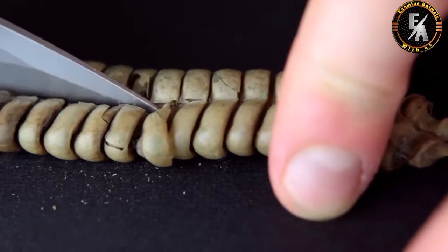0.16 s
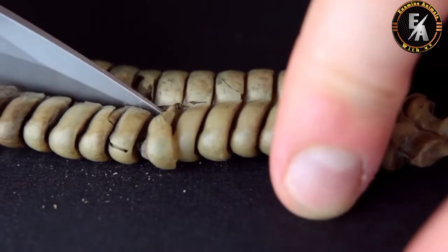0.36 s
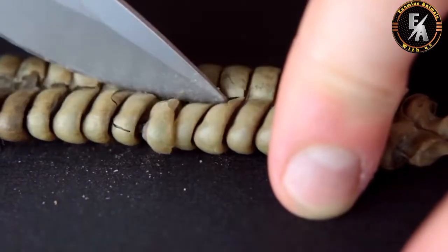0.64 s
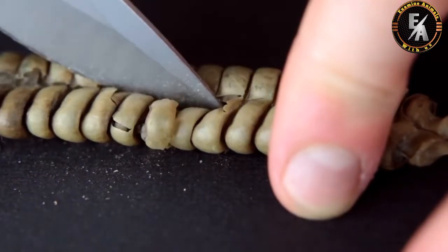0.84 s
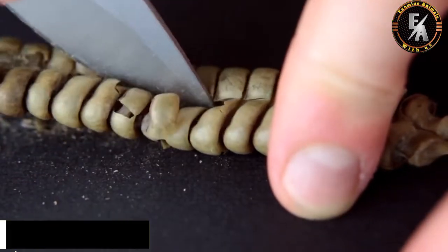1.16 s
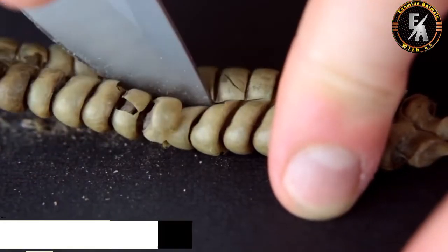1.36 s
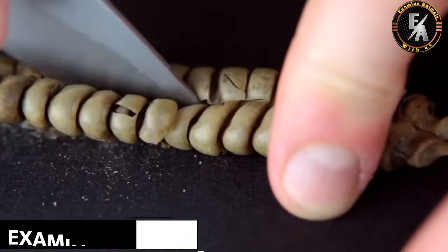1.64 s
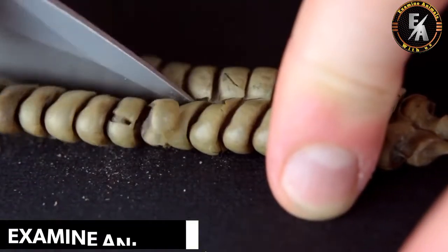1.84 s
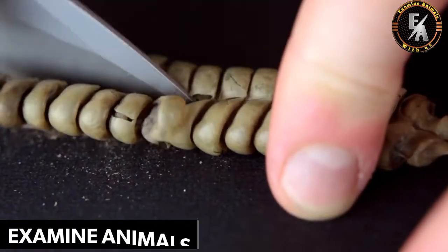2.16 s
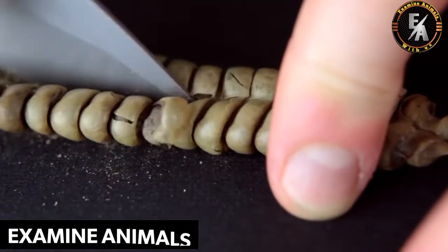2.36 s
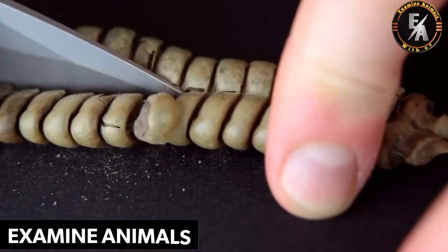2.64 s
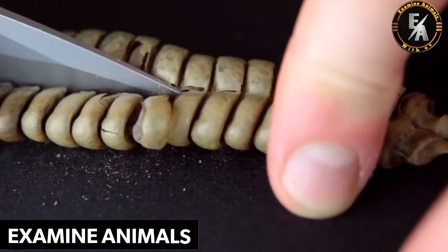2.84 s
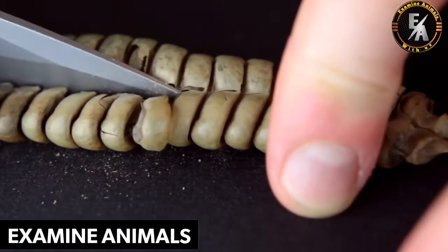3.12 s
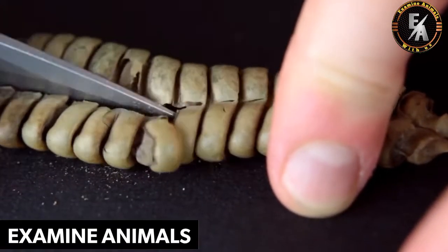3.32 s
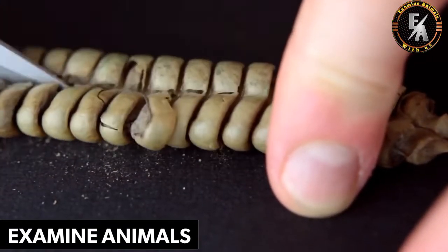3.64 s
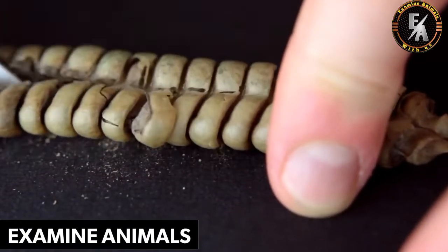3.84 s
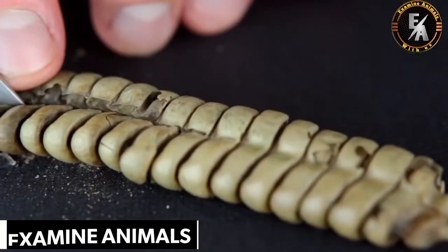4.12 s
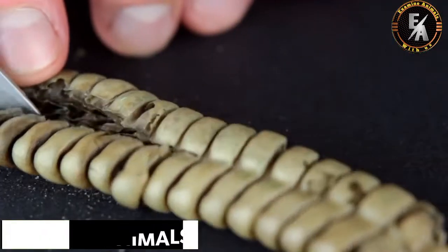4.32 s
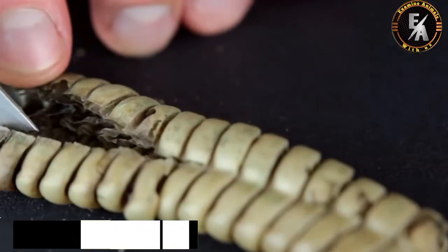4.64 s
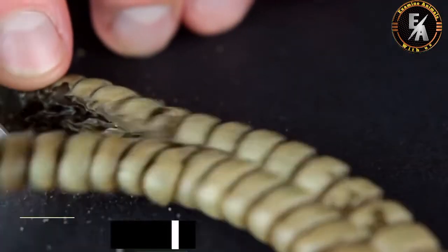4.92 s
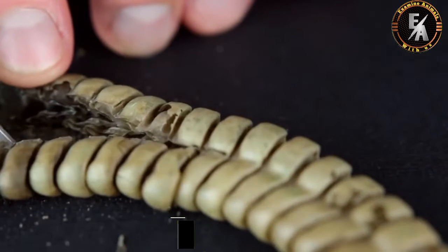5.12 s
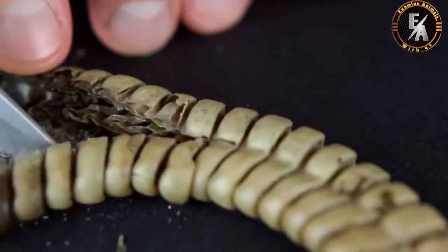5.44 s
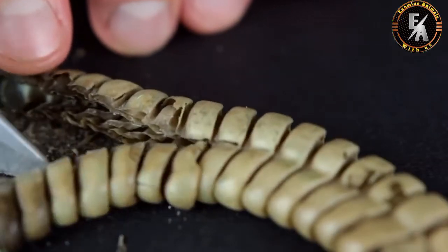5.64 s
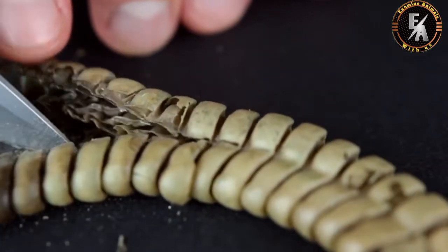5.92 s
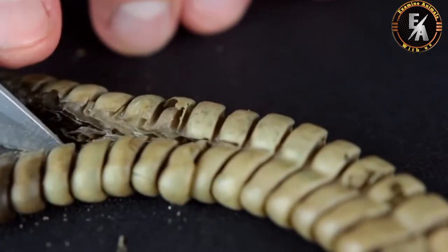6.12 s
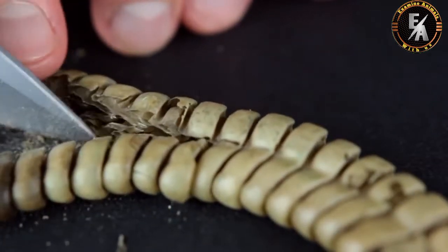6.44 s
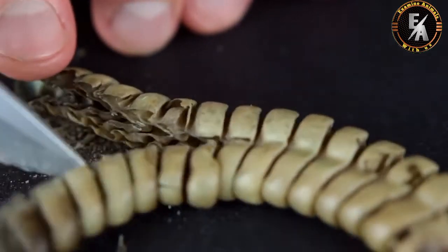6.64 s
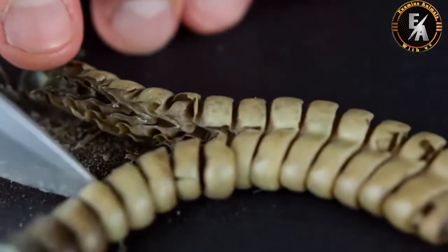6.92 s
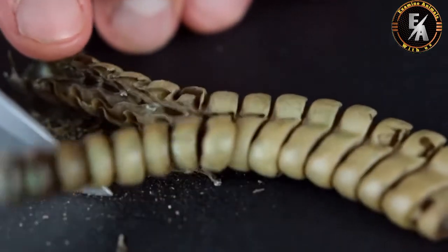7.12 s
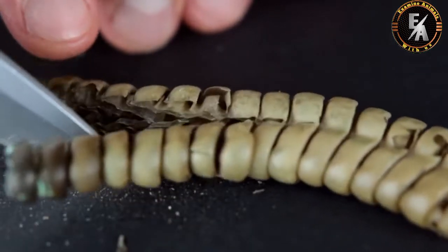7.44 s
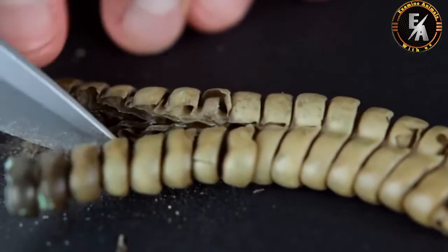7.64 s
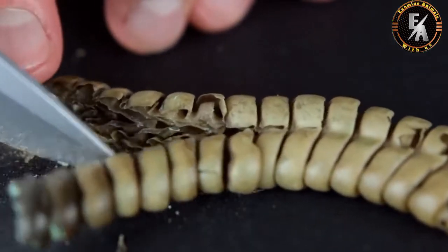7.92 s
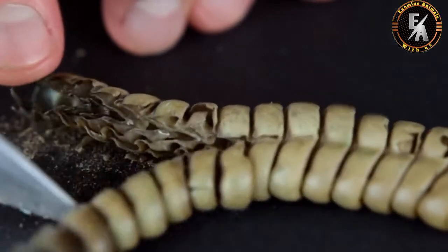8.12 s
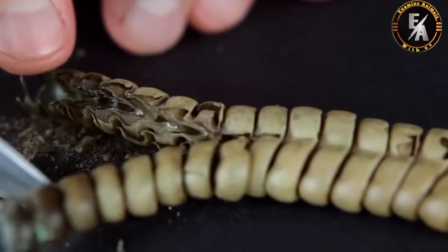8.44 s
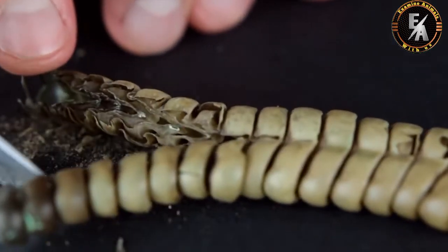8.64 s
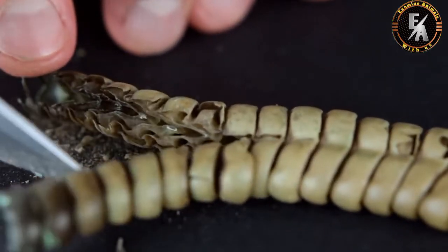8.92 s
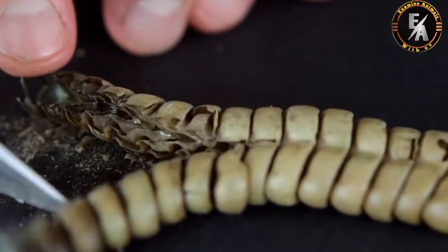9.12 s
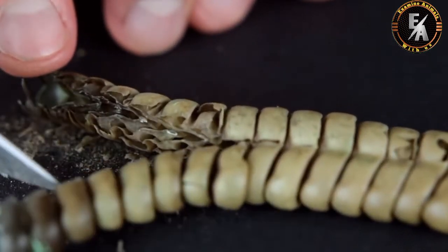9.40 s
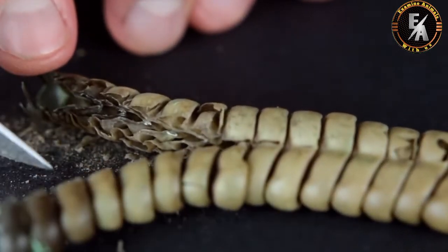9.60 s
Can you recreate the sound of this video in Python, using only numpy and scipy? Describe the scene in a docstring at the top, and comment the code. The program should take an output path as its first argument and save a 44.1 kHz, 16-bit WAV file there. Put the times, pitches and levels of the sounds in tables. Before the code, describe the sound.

Very close, dry sound of a knife cutting a hollow, horny rattle on a table. Small ticks and scrapes lead to dense sharp cracks, with dull tabletop knocks under the hardest breaks. After about three seconds it thins into rasping and rubbing; one half gives way with a snap and thump near five seconds, then only light scrapes remain over low room rumble and hiss.

```python
"""A faint knock and a brittle tick open over low room rumble and hiss: a knife splits a dried rattle on a table.
Hollow horny segments crack one after another, as noise bursts through shell, cavity and piece resonances.
The hardest breaks knock blade and shell against the tabletop, a bank of decaying modes under a dull thud.
Then the halves are prised apart: the blade rasps along them as random slips ringing shell and flakes,
and one half gives way and thumps on the table. Rubbing, thin swishes and a faint room tail fill the gaps."""
import sys
import numpy as np
from scipy import signal
from scipy.fft import rfft, irfft
from scipy.io import wavfile

SR = 44100
rng = np.random.default_rng(int(sys.argv[2]) if len(sys.argv) > 2 else 0)


def generate_wav(signal):
    """Clip the signal to [-1, 1] and save it as 16-bit WAV at the path in sys.argv[1]."""
    frames = np.transpose(np.atleast_2d(signal))
    scaled = np.clip(frames, -1, 1) * 32767
    pcm = np.round(scaled).astype(np.int16)
    wavfile.write(sys.argv[1], SR, pcm)


N = 430856


def from_db(db):
    """Decibels to gain."""
    return 10 ** (np.asarray(db) / 20)


def rms_one(x):
    """Scale to rms 1."""
    return x / np.sqrt(np.mean(x ** 2) + 1e-20)


def unit_energy(x):
    """Scale to energy 1."""
    return x / np.sqrt(np.sum(x ** 2) + 1e-20)


def blow(x):
    """Scale a short sound to the energy of 10 ms at level 1."""
    return unit_energy(x) * np.sqrt(SR * .01)


def seconds(length):
    """Time axis of a short sound."""
    return np.arange(int(length * SR)) / SR


def at_hz(points, hz):
    """Read a table on a log-frequency axis."""
    table_hz, values = np.array(points)[:, 0], np.array(points)[:, 1]
    # the tiny offset keeps 0 Hz out of the logarithm
    return np.interp(np.log(hz + 0.00089), np.log(table_hz), values)


def add(out, s, sound):
    """Mix a sound in at time s."""
    at = max(0, round(s * SR))
    out[at:at + len(sound)] += sound[:N - at]


def through(x, response):
    """Filter by an impulse response."""
    return signal.fftconvolve(x, response)[:len(x)]


def drift(rate):
    """Random wander of rms 1, with `rate` turning points per second joined by straight lines."""
    knots = rng.standard_normal(int(rate * N / SR) + 2)
    return rms_one(np.interp(np.arange(N) * rate / SR, np.arange(len(knots)), knots))


def colour(spectrum, size=2048):
    """Causal (minimum-phase) response with the shape of the given spectrum and energy 1."""
    gain = from_db(at_hz(spectrum, np.fft.rfftfreq(size, 1 / SR)))
    cepstrum = irfft(np.log(gain))
    # folding the cepstrum onto positive time makes the response minimum-phase
    cepstrum[1:size // 2] *= 2
    cepstrum[size // 2 + 1:] = 0
    return unit_energy(irfft(np.exp(rfft(cepstrum))))


def resonate(x, hz, width_hz):
    """One resonance with gain 1 at its top."""
    r = np.exp(-np.pi * width_hz / SR)
    zeros = np.array([1, 0, -1]) * (1 - r * r) / 2
    poles = [1, -2 * r * np.cos(2 * np.pi * hz / SR), r * r]
    return signal.lfilter(zeros, poles, x + 1e-18)


def burst(t, fast_s, slow_s, slow_db):
    """A sudden break followed by a weaker, slower shiver of noise."""
    envelope = np.exp(-t / fast_s) + from_db(slow_db) * np.exp(-t / slow_s)
    return rng.standard_normal(len(t)) * envelope


# rumble and hiss common to both channels, relative spectrum: (frequency [Hz], density [dB])
FLOOR_SPECTRUM = [(20, -6), (80, 0.5), (140, 1.5), (200, -6.5), (350, -9), (800, -14), (2000, -15),
                  (15500, -17)]
# background of opposite sign in left and right, relative spectrum: (frequency [Hz], density [dB])
FLOOR_SIDE_SPECTRUM = [(20, 5), (224, -1.5), (729, -2), (3500, -10), (6000, -5), (15000, -4.5)]


def floor(mid_db=-58.5, side_db=-62.5):
    """Steady coloured noise: a shared low rumble and hiss, plus a side noise that spreads it in stereo."""
    mid = rms_one(through(rng.standard_normal(N), colour(FLOOR_SPECTRUM, size=8192)))
    side = rms_one(through(rng.standard_normal(N), colour(FLOOR_SIDE_SPECTRUM, size=8192)))
    left_right = np.array([[1], [-1]])
    return from_db(mid_db) * mid + from_db(side_db) * side * left_right


# room decay: (frequency [Hz], time to fall 60 dB [s])
ROOM_DECAY = [(150, 0.67), (500, 0.24), (1200, 0.59), (2200, 0.14), (3800, 0.19), (7000, 0.027),
              (15000, 0.17)]


def room(x, onset_s=0.00043):
    """A diffuse tail: noise bands that each die away at the room's own pace for that frequency."""
    t, tail = seconds(.45), 0
    edges = np.geomspace(90, 17000, 13)
    for low, high in zip(edges, edges[1:]):
        bandpass = signal.butter(2, [low, high], "band", fs=SR, output="sos")
        band = signal.sosfilt(bandpass, rng.standard_normal(len(t)))
        t60 = at_hz(ROOM_DECAY, np.sqrt(low * high))
        tail = tail + band * np.exp(-np.log(1000) * t / t60)
    # tone of the walls: (frequency [Hz], relative density [dB])
    walls = colour([(150, -7.0), (500, 3.0), (1000, -6.5), (2000, -0.5), (3000, 1.5), (3800, -1.0),
                    (5000, 2.5), (8000, -3.0), (15000, -7.0)])
    swelling_tail = tail * (1 - np.exp(-t / onset_s))
    return through(x, unit_energy(through(swelling_tail, walls)))


SAG_DB_PER_S, RELEASE_S = 28, 0.031


def gesture(rise_s, length_s):
    """Force gathers, sags while the hand moves on, and is released."""
    t = seconds(length_s + 10 * RELEASE_S)
    attack = np.minimum(t / rise_s, 1)
    hold = from_db(-SAG_DB_PER_S * np.maximum(t - rise_s, 0))
    release = np.exp(-np.maximum(t - length_s, 0) / RELEASE_S)
    return attack * hold * release


def friction(per_s, clump_db=3.0):
    """Uneven slips in clumps; the finest merge into a hiss, more so when slips come fast."""
    sizes = from_db(4.5 * np.minimum(rng.exponential(1, N), 3.2)) * rng.choice([-1, 1], N)
    happens = rng.random(N) < per_s / SR
    slips = rms_one(sizes * happens / np.sqrt(per_s))
    hiss = rng.standard_normal(N) * np.sqrt(per_s / 4000)
    return (slips + hiss) * from_db(clump_db * drift(120))


# the rattle dragged on the table: (start [s], rise [s], length before release [s], level [dB])
DRAG_GESTURES = [(0.878, 0.042, 0.094, -52.5), (3.444, 0.14, 0.55, -52.5), (4.893, 0.043, 0.61, -56.5),
                 (6.878, 0.041, 0.45, -63)]
# dull tone of the rubbing, relative spectrum: (frequency [Hz], density [dB])
RUB_SPECTRUM = [(40, -29.5), (100, -0.5), (200, 1), (550, -14.5), (1200, -20.5), (2500, -40)]


def drag(lumps_db=1.5):
    """Dull, lumpy rubbing of shell and fingers on the tabletop: slow friction through a dark filter."""
    force = np.zeros(N)
    for s, rise_s, length_s, db in DRAG_GESTURES:
        add(force, s, from_db(db) * gesture(rise_s, length_s))
    lumpy = friction(900) * from_db(lumps_db * drift(25))
    return force * rms_one(through(lumpy, colour(RUB_SPECTRUM)))


# blade rubbing sideways: (start [s], rise [s], length before release [s], level [dB])
SWISH_GESTURES = [(3.764, 0.11, 0.12, -52), (7.948, 0.077, 0.27, -52.5)]
SWISH_START_HZ, SWISH_SINK_HZ_PER_S = 8270, 6000


def swish(width_hz=1300):
    """A thin band of friction that sinks in pitch as the contact moves along the shell."""
    glide = np.zeros(N)
    for s, rise_s, length_s, db in SWISH_GESTURES:
        force = from_db(db) * gesture(rise_s, length_s)
        hz = SWISH_START_HZ - SWISH_SINK_HZ_PER_S * np.arange(len(force)) / SR
        carrier = np.sqrt(2) * np.cos(2 * np.pi * np.cumsum(hz) / SR)
        add(glide, s, force * carrier)
    lowpass = signal.butter(2, width_hz, fs=SR, output="sos")
    # low friction noise multiplied by the carrier becomes a band around it
    return glide * rms_one(signal.sosfilt(lowpass, friction(2500)))


# for a while the point works in narrower segments, whose cavities ring higher by this ratio
NARROW_FROM_S, NARROW_UNTIL_S, NARROW_TUNING = 0.5, 1.5, 1.14


def in_narrow_part(s):
    """Whether the point is in the narrower segments at time s."""
    return (s > NARROW_FROM_S) & (s < NARROW_UNTIL_S)


# air cavities of the hollow segments before tuning: (frequency [Hz], width [Hz], relative level [dB])
CAVITY_MODES = [(2266, 290, 2), (3180, 230, 2.5), (3680, 230, 9), (4400, 160, -5), (5925, 370, -7.5)]


def hollow(x, ring_db, tuning=1):
    """The air in the segments rings along with whatever shakes the shell."""
    air = sum(from_db(db) * resonate(x, hz * tuning, width) for hz, width, db in CAVITY_MODES)
    return x + from_db(ring_db) * air


# lone slips while the point cuts, a dense rasp while the blade slides
CUT_FROM_S, CUT_UNTIL_S = 0.61, 3.45
CUT_SLIPS_PER_S, SLIDE_SLIPS_PER_S = 700, 2500


def slip_rate():
    """Slips per second: few while cutting, many while sliding."""
    t = np.arange(N) / SR
    return np.where((t > CUT_FROM_S) & (t < CUT_UNTIL_S), CUT_SLIPS_PER_S, SLIDE_SLIPS_PER_S)


# strokes of the blade along the shell, before the pressure wanders:
# (start [s], rise [s], length before release [s], rasp level [dB], grit relative to rasp [dB])
BLADE_STROKES = [(0.225, 0.11, 0.17, -46.5, -6), (0.571, 0.11, 0.31, -51, -8),
                 (0.826, 0.046, 0.33, -46.5, -3), (1.186, .06, 0.24, -45.5, -4),
                 (1.554, 0.39, 0.55, -39.5, -2), (2.177, 0.18, 0.15, -41.5, 3.5),
                 (2.476, 0.072, 0.13, -44, 0.5), (2.723, 0.046, 0.2, -48.5, 3),
                 (3.27, 0.098, 0.25, -47, -2), (3.464, 0.067, 0.13, -44, -1.5),
                 (3.605, 0.041, 0.074, -42.5, 0), (3.68, 0.23, 0.36, -51.5, 0.5),
                 (4.261, 0.13, 0.24, -45, -3.5), (4.561, 0.01, 0.15, -47.5, -6),
                 (4.74, 0.043, 0.03, -54.5, -0.5), (4.84, 0.041, 0.18, -54, -7),
                 (4.986, 0.033, 0.03, -40, 1.5), (5.039, 0.002, 0.0072, -27, -4.5),
                 (5.428, 0.064, 0.074, -41.5, -3), (5.517, 0.0073, 0.14, -59, -23),
                 (5.787, 0.034, 0.078, -54.5, -15), (6.103, 0.074, 0.06, -49, 2),
                 (6.282, 0.047, 0.084, -61, -6), (6.562, 0.24, 0.38, -51.5, -5.5),
                 (6.97, 0.11, 0.16, -54, 0), (7.18, 0.025, 0.029, -46.5, -2),
                 (7.24, 0.0088, 0.063, -49.5, -6.5), (7.419, 0.039, 0.063, -48.5, -1.5),
                 (7.526, 0.11, 0.099, -49, -5), (7.728, 0.037, 0.052, -58.5, 1),
                 (7.92, 0.26, 0.38, -52, -5), (8.416, 0.048, 0.08, -49.5, -4),
                 (8.656, .05, 0.059, -60.5, -2.5), (8.978, 0.021, 0.093, -56, 2),
                 (9.126, 0.13, 0.22, -48, -4)]
# between strokes the blade rests lightly on the shell, until it is lifted
RESTING_DB, RESTING_WANDER_DB, RESTING_GRIT_DB, LIFT_S = -63.5, 4.5, -8.5, 5.9
# broken edges grate on after a crack: level against its ring, and how fast they settle
SETTLE_DB, SETTLE_DB_PER_S = -30.5, 106


def contact():
    """Strength of rasp and grit: powers of strokes, resting blade and edges settling after cracks add up."""
    t, settling = seconds(0.58), np.zeros(N)
    for s, ring_db, _, _ in CRACK_EVENTS:
        add(settling, s, from_db(ring_db + SETTLE_DB - SETTLE_DB_PER_S * t) ** 2)
    not_lifted = np.arange(N) / SR < LIFT_S
    resting = from_db(RESTING_DB + RESTING_WANDER_DB * drift(10)) * not_lifted
    rasp_power = settling + resting ** 2
    grit_power = rasp_power * from_db(RESTING_GRIT_DB) ** 2
    for s, rise_s, length_s, db, grit_db in BLADE_STROKES:
        force = from_db(db) * gesture(rise_s, length_s)
        add(rasp_power, s, force ** 2)
        add(grit_power, s, (from_db(grit_db) * force) ** 2)
    return np.sqrt(rasp_power), np.sqrt(grit_power)


def flakes(slips, low_hz, high_hz, width_hz, wander_db=6.5, count=14):
    """Each slip rings one of several pieces; which of them speak changes as the edge moves on."""
    dealt = rng.integers(0, count, N)
    ringing = 0
    for k, hz in enumerate(np.geomspace(low_hz, high_hz, count)):
        piece = resonate(slips * (dealt == k), hz, width_hz)
        ringing = ringing + piece * from_db(wander_db * drift(6.3))
    return rms_one(ringing)


# body of the scrape, relative spectrum: (frequency [Hz], density [dB])
RASP_SPECTRUM = [(500, -7.5), (1400, -8), (2200, -5.5), (3600, 3), (5000, 3.5), (7000, -6.5), (10000, -16),
                 (16000, -4)]
# fizz on top of the scrape, relative spectrum: (frequency [Hz], density [dB])
GRIT_SPECTRUM = [(2000, -27), (4500, -15), (7000, 2.5), (9000, 3.5), (12500, 0.5), (15500, -5)]
# resonances of the thin shell walls: (frequency [Hz])
WALL_HZ = [7330, 9500, 12450]
WALL_WIDTH_HZ = 450


def scrape(rasp_gain, grit_gain, flake_db=-4.5, chip_db=-8.5, catch_db=4.5, wall_db=-10.5):
    """The edge catches and slips, jerkier when slow: shell and chips rasp, small flakes and walls add grit."""
    per_s = slip_rate()
    jerk_db = catch_db * np.sqrt(per_s.min() / per_s)
    pressure = rms_one(from_db(jerk_db * drift(150)))
    fine, coarse = friction(per_s), friction(1.5 * per_s)

    rubbed = through(coarse, colour(RASP_SPECTRUM))
    wide = hollow(rubbed, ring_db=-4.5)
    narrow = hollow(rubbed, ring_db=-4.5, tuning=NARROW_TUNING)
    shell = rms_one(np.where(in_narrow_part(np.arange(N) / SR), narrow, wide))
    chips = flakes(coarse, low_hz=3100, high_hz=6000, width_hz=260)
    rasp = rms_one(shell + from_db(chip_db) * chips)

    fizz = through(fine, colour(GRIT_SPECTRUM))
    walls = sum(resonate(fizz, hz, WALL_WIDTH_HZ) for hz in WALL_HZ)
    fizz = rms_one(fizz + from_db(wall_db) * walls)
    small_flakes = flakes(fine, low_hz=6000, high_hz=14400, width_hz=350)
    grit = rms_one(fizz + from_db(flake_db) * small_flakes)
    return pressure * (rasp_gain * rasp + grit_gain * grit)


def crumbs(rasp_gain, tries=1100, shell_db=0, piece_db=-1, spread_db=9, over_rasp_db=-7.0):
    """Tiny splinters snap off at random under the edge, most of them while it cuts slowly."""
    out, t = np.zeros(N), seconds(.015)
    level_db, per_s = 20 * np.log10(rasp_gain + 1e-9), slip_rate()
    splinter, shell = colour(SPLINTER_SPECTRUM, size=256), colour(SHELL_SPECTRUM, size=256)
    for when, chance, size, pitch in rng.random((tries, 4)):
        at = int(when * N)
        if chance < per_s.min() / per_s[at]:
            snap = burst(t, fast_s=.0003, slow_s=.002, slow_db=-22)
            piece = unit_energy(resonate(snap, 2800 * 4.5 ** pitch, 500))
            edge = unit_energy(through(snap, splinter))
            body = from_db(shell_db) * unit_energy(through(snap, shell))
            # few crumbs are large, and none is louder than -39 dB
            db = min(level_db[at] + over_rasp_db + spread_db * size ** 2, -39)
            add(out, at / SR, from_db(db) * blow(edge + body + from_db(piece_db) * piece))
    return out


# blows passed to the table: (time [s], level [dB], centre of the push [Hz]: low = soft and heavy); # the rows #
# near 2 kHz at 1.5558 and 1.892 are no blows: they only add a harsh mid band under the two loudest cracks
TABLE_KNOCKS = [(0.001, -46, 835), (1.173, -40.5, 161), (1.205, -29.5, 151), (1.2065, -35, 613),
                (1.332, -42, 590), (1.522, -43.5, 680), (1.5558, -23.5, 1980), (1.556, -22, 506),
                (1.727, -34.5, 644), (1.739, -35.5, 690), (1.779, -34.5, 670), (1.798, -39, 949),
                (1.842, -36.5, 610), (1.891, -18, 630), (1.892, -21, 1880), (1.893, -45, 70),
                (1.987, -16.5, 865), (2.152, -32.5, 990), (2.288, -35, 875), (2.335, -33, 840),
                (2.39, -27.5, 925), (2.561, -32.5, 720), (2.62, -33.5, 840), (2.908, -47.5, 1700),
                (3.473, -51.5, 520), (3.53, -52, 300), (3.603, -44, 175), (4.35, -48.5, 1106),
                (5.028, -35.5, 2400), (5.052, -22, 142), (5.054, -22.5, 480), (5.341, -54, 200),
                (5.43, -53.5, 298), (5.608, -50, 646), (7.27, -53.5, 198)]
# tabletop modes, before each spot varies them:
# (frequency [Hz], relative level [dB], time to fall 60 dB [s])
TABLETOP_MODES = [(151, 4, 0.14), (228, -3.5, 0.284), (277, -7, 0.15), (404, -1.5, 0.25), (480, 0, 0.097),
                  (498.6, -7, 0.33), (587, -0.5, 0.049), (668, -7, 0.16), (830, -4.5, 0.059),
                  (955, 9.5, 0.075), (1185, -1, 0.18), (1274, -5, 0.15), (1490, -6, 0.17), (1600, -4, 0.2)]


def knocks(push_width=0.77, spread_db=2.0, softness=3.0, ring_db=-2.5, ring_db_per_octave=-3.5,
           bottom_db=-16, detune=0.011):
    """A push gives a broad, ragged thud and rings the tabletop modes, differently at each blow."""
    out, t = np.zeros(N), seconds(.4)
    hz, mode_db, t60 = np.transpose(TABLETOP_MODES)[:, :, None]
    # tone of the thud: (frequency [Hz], relative density [dB])
    top = colour([(50, -13.5), (150, -3), (300, -0.5), (480, 4.0), (950, 0), (1500, -1.0),
                  (2500, -12), (8000, -33.5)])
    for s, db, push_hz in TABLE_KNOCKS:
        spot, strength, sign = rng.standard_normal((3, len(hz), 1))
        decay = from_db(mode_db + spread_db * strength - 60 * t / t60)
        modes = np.sign(sign) * decay * np.sin(2 * np.pi * hz * (1 + detune * spot) * t)
        ragged = through(burst(t, fast_s=0.0033, slow_s=0.0341, slow_db=-24.5), top)
        # the push favours whatever lies near its own centre
        ring = unit_energy(resonate(modes.sum(0), push_hz, push_width * push_hz))
        thud = unit_energy(resonate(ragged, push_hz, push_width * push_hz))
        # the push itself, one short hump of force, fills in the bass
        bottom = unit_energy(t * np.exp(-2 * np.pi * push_hz * t))
        # the slower the push, the more of it goes into the modes
        ring = ring * from_db(ring_db + ring_db_per_octave * np.log2(push_hz / 500))
        # a soft push cannot reach high
        soft = signal.butter(3, min(softness * push_hz, SR / 4), fs=SR, output="sos")
        knock = signal.sosfilt(soft, ring + thud + from_db(bottom_db) * bottom)
        add(out, s, from_db(db) * blow(knock))
    return out


# shell cracks: (time [s], shell ring before the shell lift [dB], bright splinter level [dB],
# pitch of the broken piece [Hz])
CRACK_EVENTS = [(0.0261, -56.5, -47.5, 12200), (0.3384, -43, -40.5, 4560), (0.366, -44, -41, 12500),
                (0.381, -50, -29.5, 7100), (0.576, -31, -42, 3980), (0.718, -52, -43.5, 10100),
                (0.7769, -25, -39, 4040), (0.791, -59, -43, 10100), (0.8348, -49, -40, 9500),
                (0.8563, -42, -41, 5630), (0.8794, -31, -27, 4200), (0.8922, -38, -42, 8900),
                (0.9066, -31, -29, 4260), (0.9501, -32, -27, 5940), (0.9597, -22, -16.5, 4400),
                (0.9766, -33.5, -24.5, 13300), (1.0025, -39, -38, 4000), (1.0427, -47, -34, 14100),
                (1.114, -30, -24, 4260), (1.157, -36, -33, 4800), (1.1717, -17, -22, 4200),
                (1.2057, -16, -18, 5500), (1.316, -39.5, -29, 13400), (1.3314, -23.5, -20.5, 5770),
                (1.3413, -37.5, -34, 5450), (1.4043, -42, -39, 4700), (1.5152, -34.5, -31, 5600),
                (1.522, -37.5, -31, 4960), (1.556, -21.5, -17, 12300), (1.7261, -28, -20, 12800),
                (1.7393, -25, -23, 3920), (1.7484, -33, -25, 12300), (1.779, -26, -16.5, 10360),
                (1.8923, -13, -17.5, 3700), (1.966, -45, -34, 12100), (1.9877, -18.5, -23, 3780),
                (2.0244, -33, -35, 4200), (2.035, -35.5, -24.5, 12600), (2.093, -23, -19.5, 4600),
                (2.1533, -25.5, -36, 3530), (2.2242, -25.5, -22, 4760), (2.239, -28.5, -19.5, 13100),
                (2.288, -30, -55, 3660), (2.3056, -34, -28, 5400), (2.3347, -23, -21, 4650),
                (2.3894, -20, -18.5, 3350), (2.515, -42.5, -36, 5670), (2.5523, -31, -24, 14000),
                (2.5883, -36, -31.5, 13000), (2.621, -34, -57, 3360), (2.67, -22.5, -20, 6200),
                (2.704, -36.5, -36.5, 5400), (2.9075, -24.5, -20.5, 3680), (2.91, -31, -26, 7800),
                (3.1508, -40.5, -33.5, 10100), (3.209, -45, -47, 3760), (3.435, -43, -43, 5330),
                (3.4725, -38.5, -33, 10800), (3.4924, -36.5, -32, 6000), (3.5295, -32, -30, 4200),
                (3.543, -38, -35, 4400), (3.6528, -45, -39, 3700), (4.2661, -41, -34.5, 12600),
                (4.2873, -41, -38, 12800), (4.2913, -43, -33, 13000), (4.2994, -36, -36, 4660),
                (4.35, -32.5, -38, 5030), (4.3712, -36, -33, 4540), (4.447, -49, -38, 9400),
                (4.796, -52, -43.5, 9600), (4.8749, -46, -44, 3830), (4.9093, -40, -34, 12400),
                (5.01, -40, -42, 4180), (5.028, -24.5, -17, 10300), (5.0381, -30, -21.5, 9500),
                (5.0534, -28, -41, 3520), (6.1696, -49, -38.5, 12700), (6.496, -51, -43, 11700),
                (6.8922, -43.5, -37, 10100), (6.9837, -50, -40.5, 12300), (7.677, -49, -50, 6400),
                (8.169, -44.5, -39.5, 3560), (8.177, -49.5, -40, 9100), (8.4603, -44, -46, 3660)]
# tone of the flexing shell, relative spectrum: (frequency [Hz], density [dB])
SHELL_SPECTRUM = [(300, -22), (1000, -20), (1800, -15.5), (2700, -8), (3800, -4.5), (5500, 1), (7000, -3.5),
                  (10000, -6), (16000, -29.5)]
# tone of the splintering edge, relative spectrum: (frequency [Hz], density [dB])
SPLINTER_SPECTRUM = [(1500, -41), (4000, -24), (6500, -8.5), (8500, 4), (10500, 3.5), (12600, 6),
                     (15500, 1.5)]


def cracks(piece_width_hz=400, piece_db=-2, shell_lift_db=1.0, linger_db=-15, linger_s=0.0081,
           size_spread=0.055, after_db=-19, after_s=0.024):
    """A millisecond fracture rings its segment and one broken piece; the note of a large piece lingers."""
    out, t = np.zeros(N), seconds(.15)
    shell, splinter = colour(SHELL_SPECTRUM), colour(SPLINTER_SPECTRUM)
    for s, ring_db, splinter_db, hz in CRACK_EVENTS:
        flex = burst(t, fast_s=.0012, slow_s=.006, slow_db=-18)
        snap = burst(t, fast_s=.0007, slow_s=.004, slow_db=-19)
        segment_size = 1 + size_spread * rng.standard_normal()
        tuning = (NARROW_TUNING if in_narrow_part(s) else 1) * segment_size
        body = hollow(through(flex, shell), ring_db=1.5, tuning=tuning)
        edge = through(snap, splinter)
        piece = from_db(piece_db) * unit_energy(resonate(snap, hz, piece_width_hz))
        shiver = rng.standard_normal(len(t)) * np.exp(-t / linger_s)
        # two resonances in a row give the lingering note a narrower skirt
        once = resonate(shiver, hz, 2 * piece_width_hz)
        note = from_db(linger_db) * unit_energy(resonate(once, hz, 2 * piece_width_hz))
        # small pieces ring with the splintering edge, large ones with the shell
        small = hz > 7000
        body = blow(unit_energy(body) + (piece + note) * (not small))
        edge = blow(unit_energy(edge) + .5 * piece * small)
        add(out, s, from_db(ring_db + shell_lift_db) * body + from_db(splinter_db) * edge)
        # the fracture creeps on in two tiny snaps, each with a pitch of its own
        for wait, pitch in rng.random((2, 2)):
            chip = resonate(snap, 3500 * 3 ** pitch, 1500)
            add(out, s + after_s * wait, from_db(splinter_db + after_db) * blow(chip))
    return out


def scene(room_db=-18):
    """Knife and rattle sit dead centre, over the stereo background."""
    rasp_gain, grit_gain = contact()
    breaking = cracks() + crumbs(rasp_gain) + knocks()
    rubbing = scrape(rasp_gain, grit_gain) + swish() + drag()
    close = breaking + rubbing
    return close + from_db(room_db) * room(close) + floor()


def record(dry, cutoff_hz=15700):
    """The sharpest cracks overload the input, positive peaks a little sooner; the top is cut."""
    ceiling = np.where(dry > 0, .88, 1.0)
    rounded = dry / (1 + (dry / ceiling) ** 6) ** (1 / 6)
    lowpass = signal.ellip(12, .2, 90, cutoff_hz, fs=SR, output="sos")
    return signal.sosfilt(lowpass, rounded)


dry = scene()
out = record(dry)
generate_wav(out)
```